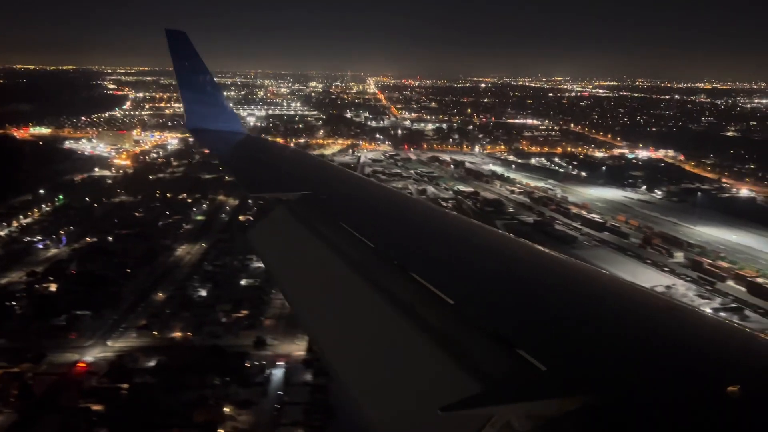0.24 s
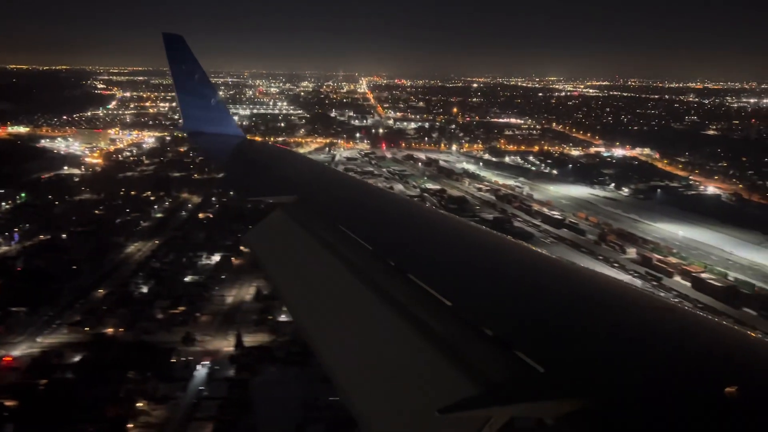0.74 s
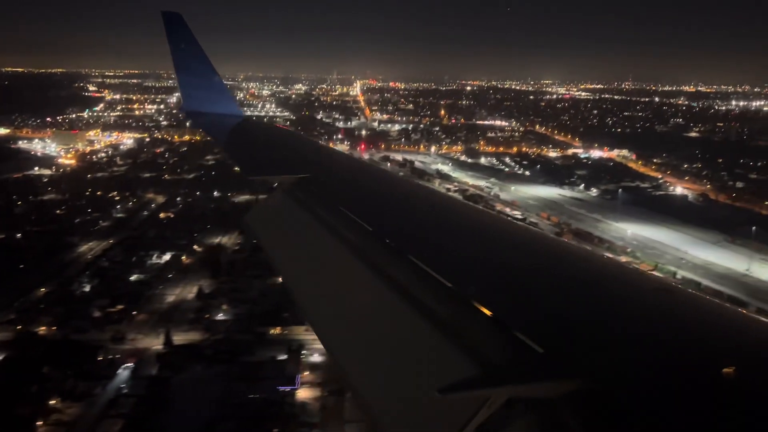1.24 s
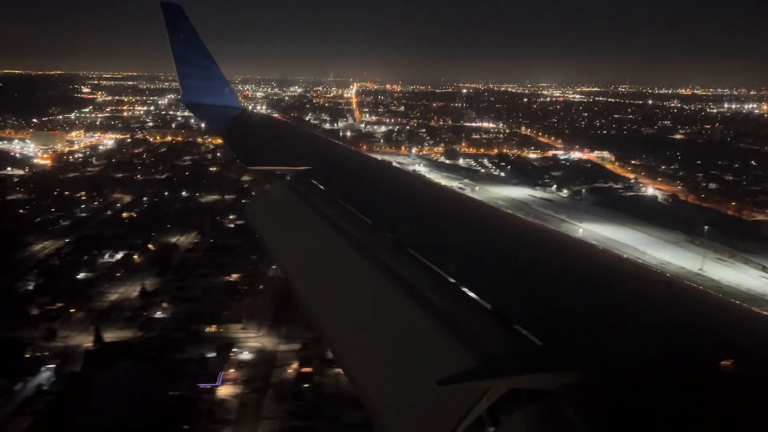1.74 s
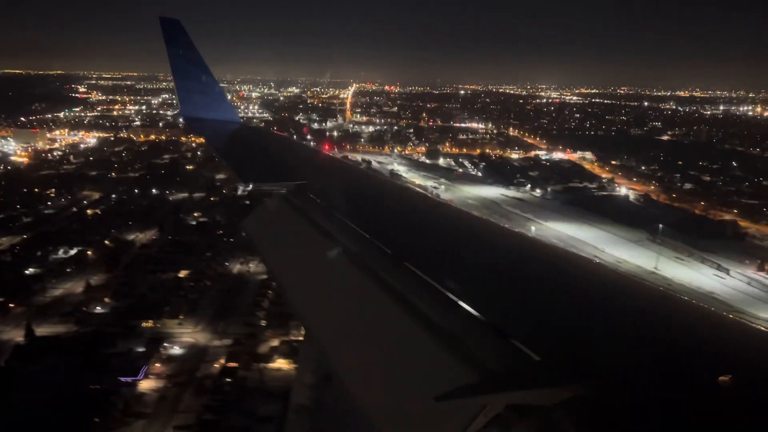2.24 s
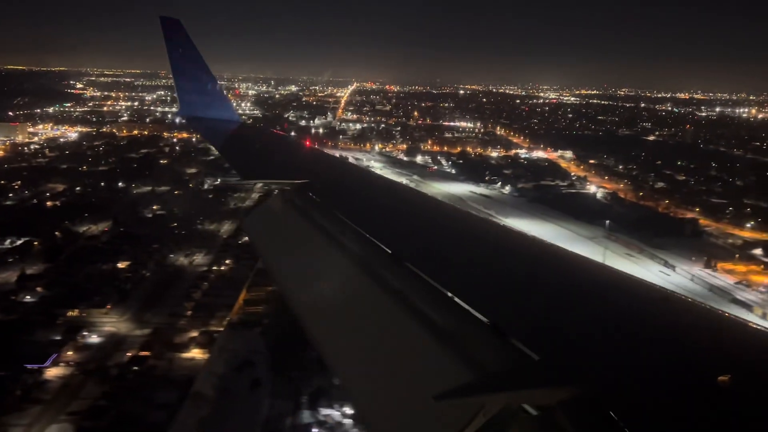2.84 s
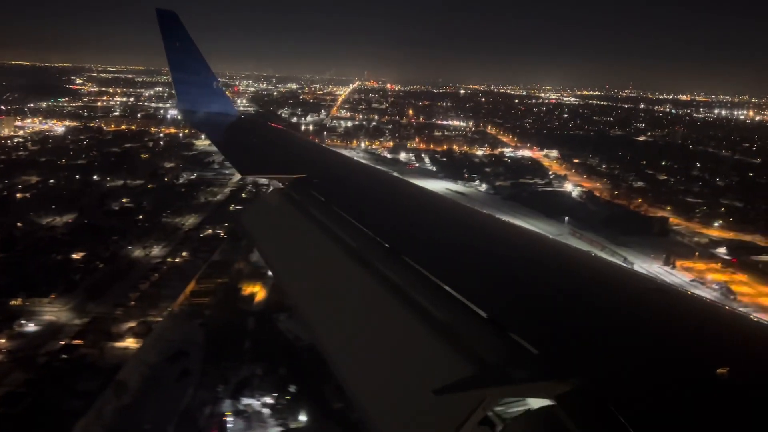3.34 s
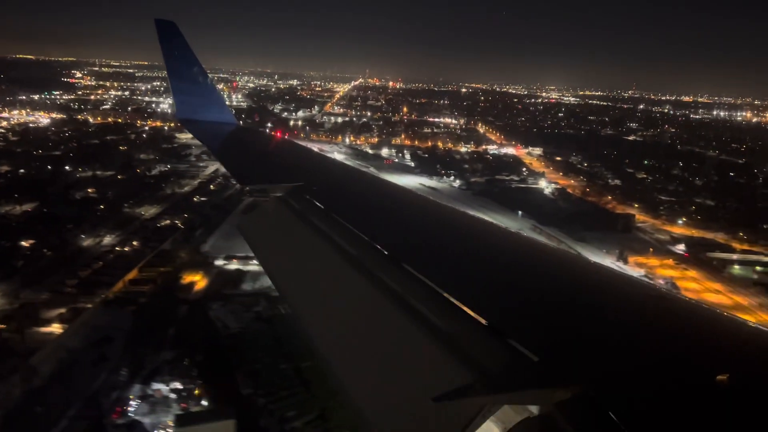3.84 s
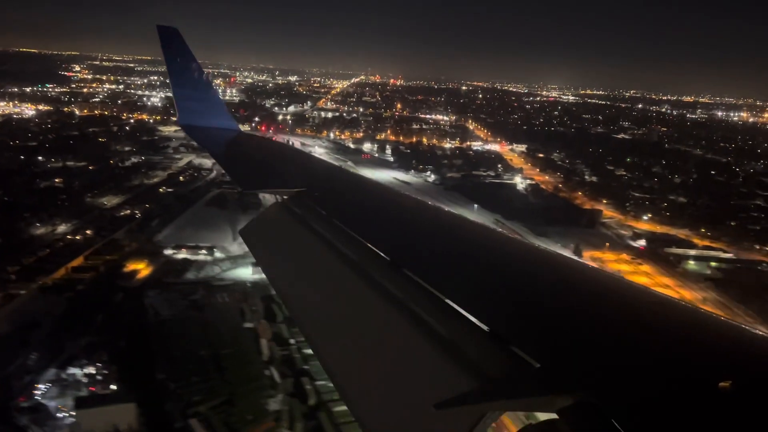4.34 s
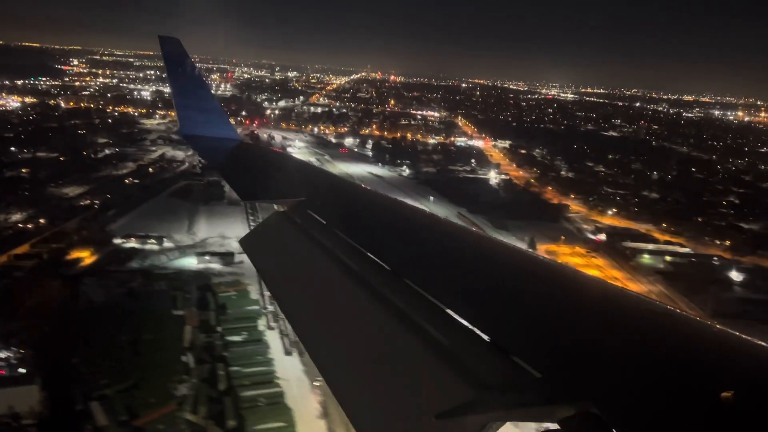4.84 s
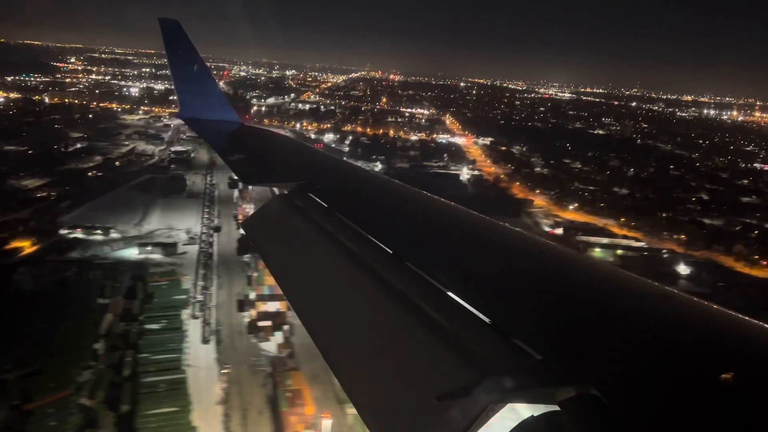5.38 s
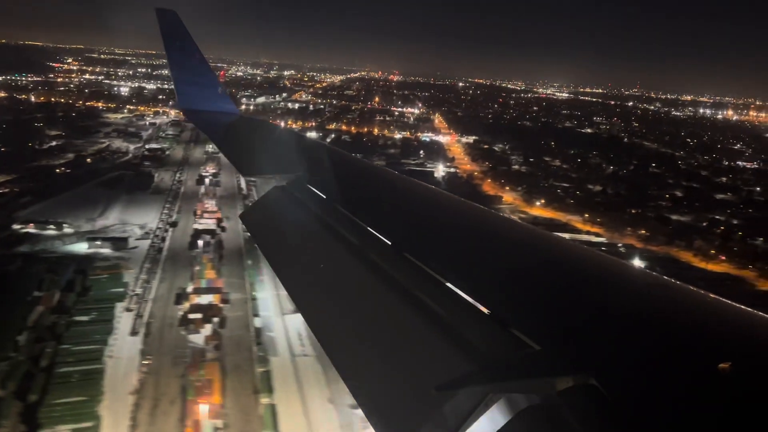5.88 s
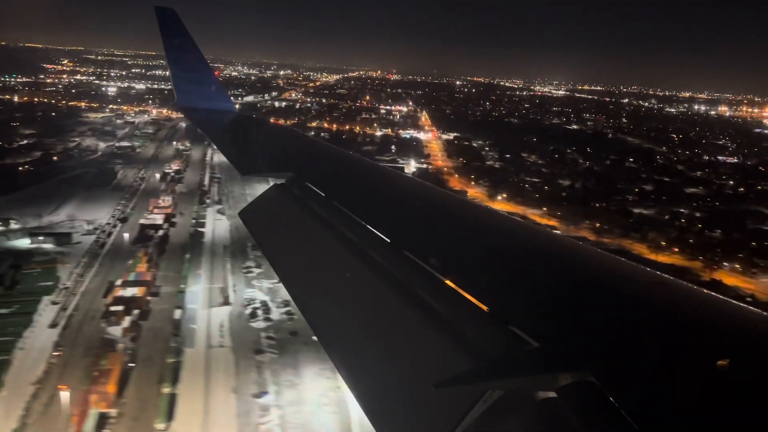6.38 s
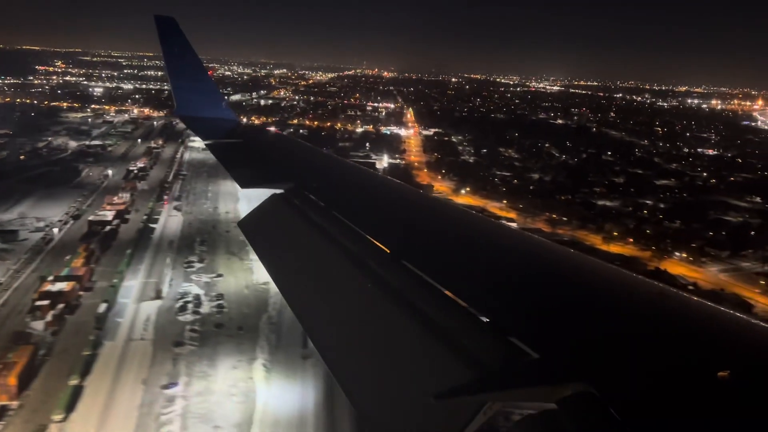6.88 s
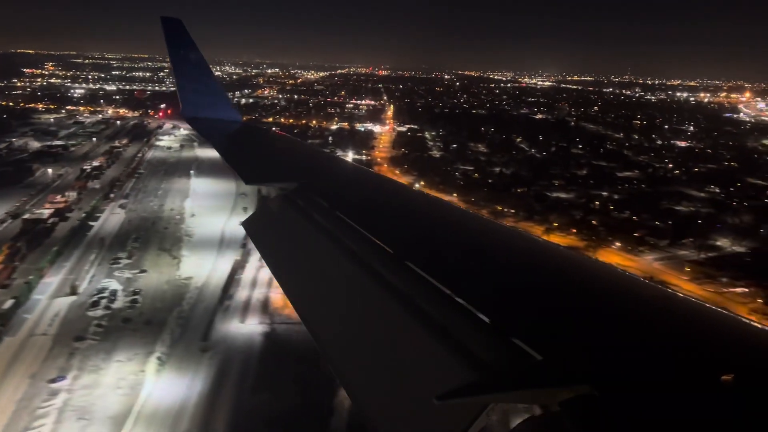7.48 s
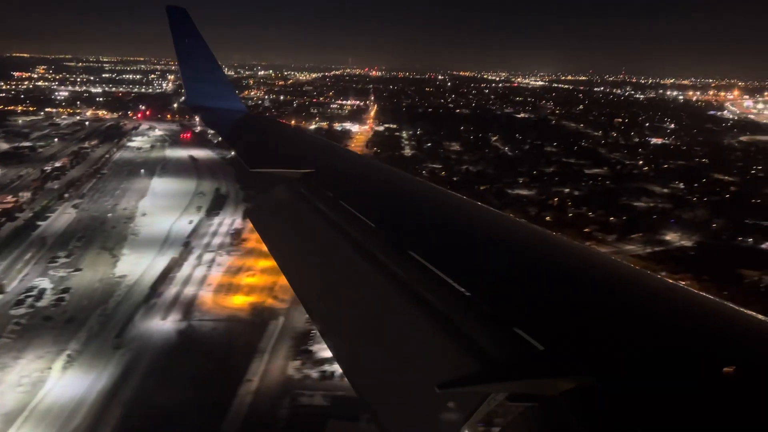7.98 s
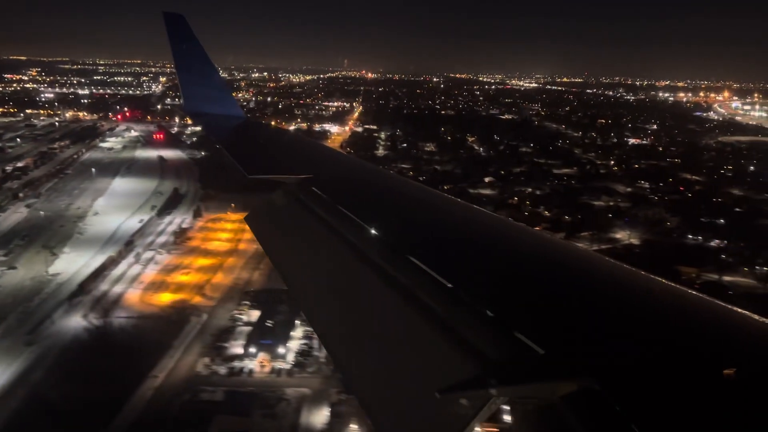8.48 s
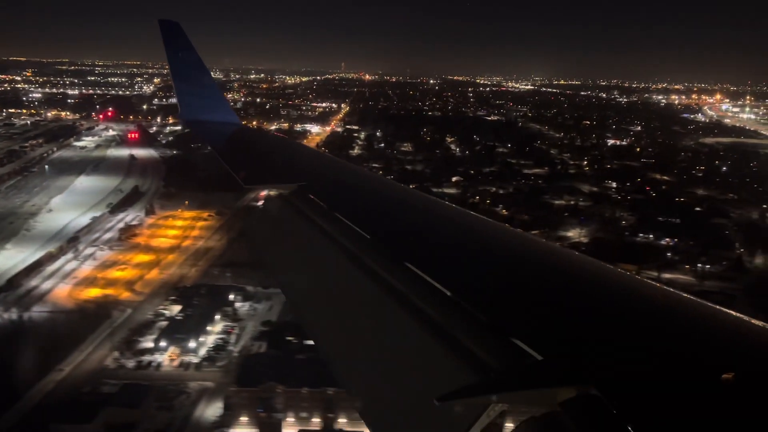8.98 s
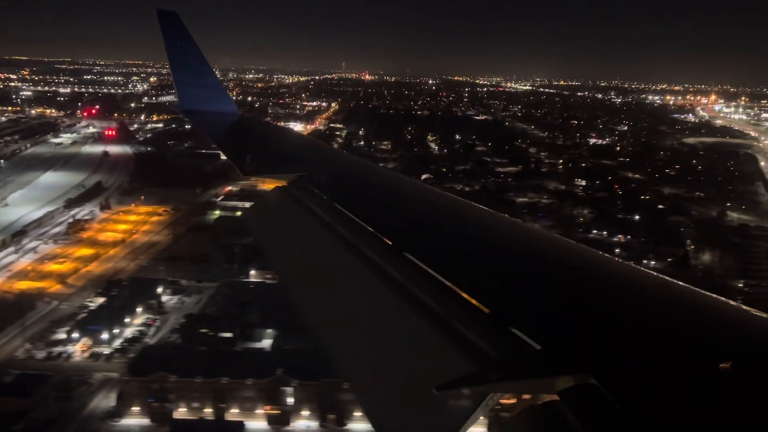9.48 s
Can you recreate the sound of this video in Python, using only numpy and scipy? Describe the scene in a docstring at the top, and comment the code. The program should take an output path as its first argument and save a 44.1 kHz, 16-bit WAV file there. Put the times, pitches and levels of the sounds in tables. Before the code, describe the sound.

Steady airliner cabin roar with a deep jet hum and faint high whines that step slightly upward twice, plus tiny trim squeaks and ticks.

```python
"""Two jet engines whine and beat against each other, spooling up in two small steps, at a window seat
over the wing of an airliner on approach. Rotors are drifting tones tied to the shaft speeds.
Turbulent air, as shaped noise, rumbles, rushes and hisses; short swells of band noise thicken the rumble.
Cabin fans, a pump, a blower and twin motors add tones; the trim squeaks and ticks with short noise bursts."""
import sys
import numpy as np
from scipy import signal
from scipy.fft import rfft, irfft, next_fast_len
from scipy.io import wavfile
from scipy.ndimage import uniform_filter1d

SR = 44100
rng = np.random.default_rng(int(sys.argv[2]) if len(sys.argv) > 2 else 0)


def wav_record(signal):
    """Record a signal, one row per channel, as 16-bit PCM in the file named by sys.argv[1]."""
    frames = np.transpose(np.atleast_2d(signal))
    bounded = np.clip(frames, -1, 1)
    # unit amplitude maps onto the largest positive 16-bit level
    quanta = np.round(bounded * 32767).astype(np.int16)
    wavfile.write(sys.argv[1], SR, quanta)


N = 428640

# core shaft speed, which answers each throttle push sooner than the fan: (time [s], speed [Hz])
CORE_SPEED = [(0, 233), (1.8, 233.15), (2.2, 234.45), (3.5, 234.74), (3.85, 235), (4.25, 237.15),
              (5, 237.37), (5.5, 237.8), (6.2, 238.02), (9.7, 238.13)]


def from_db(db):
    """Decibels to gain."""
    return 10 ** (np.asarray(db) / 20)


def in_time(rows):
    """Each column of a curve table at every sample."""
    time_s, *columns = np.transpose(rows)
    return [np.interp(np.arange(N) / SR, time_s, column) for column in columns]


def at_hz(rows, hz):
    """Each column of a spectrum table, joined on a log-frequency axis."""
    points_hz, *columns = np.transpose(rows)
    return [np.interp(np.log(hz + 1e-9), np.log(points_hz), column) for column in columns]


def bump(x, centre, width):
    """A bell of height 1, `width` wide at half height."""
    return np.exp2(-np.minimum((2 * (x - centre) / width) ** 2, 20))


def drift(rate_hz):
    """Slow noise of spread 1 that changes about `rate_hz` times a second."""
    step = 40  # samples between drawn points
    pole = np.exp(-2 * np.pi * rate_hz * step / SR)
    white = rng.standard_normal(N // step + 2002)
    slow = signal.lfilter([1], [1, -2 * pole, pole * pole], white)[2000:]  # drop the filter's run-in
    return np.interp(np.arange(N) / step, np.arange(len(slow)), slow / slow.std())


def panned(pan_db):
    """Left and right gains of equal total power."""
    gains = from_db([[pan_db / 2], [-pan_db / 2]])
    return gains / np.sqrt(np.mean(gains ** 2))


def tone(hz, level_db, unsteady, flutter_rate, pan_db, lead, ahead=0):
    """A rotor's line, `ahead` [rad] early; moving air scatters a share of it in level and phase."""
    turn = 2 * np.pi * np.cumsum(hz * np.ones(N)) / SR + ahead
    turn = turn + np.array([[lead / 2], [-lead / 2]])  # left leads by `lead` [rad]
    share = np.clip(unsteady, 0, 1)
    in_phase = np.sqrt(2 * (1 - share ** 2)) + share * drift(flutter_rate)
    across = share * drift(flutter_rate)
    return from_db(level_db) * panned(pan_db) * (in_phase * np.cos(turn) + across * np.sin(turn))


def shaft_speed(rows):
    """A speed curve, its corners rounded by the rotor's inertia."""
    inertia_s = .2
    return uniform_filter1d(in_time(rows)[0], int(inertia_s * SR), mode="nearest")


def spool(start_hz, first_hz, second_hz, lag_s):
    """A speed that follows two pushes of the throttle along an S-shaped lag."""
    pushes_s, shape = (1.8, 3.78), 1.3
    t = np.arange(N) / SR
    first, second = (1 - np.exp(-(np.maximum(t - s, 0) / lag_s) ** shape) for s in pushes_s)
    return start_hz + first_hz * first + second_hz * second


def trim_ticks():
    """A panel edge snaps free with a tiny click: decaying noise, high-passed."""
    # dry ticks: (time [s], noise level at onset before the high-pass [dB])
    ticks = [(1.0212, -53), (1.3799, -49), (5.7954, -54)]
    decay_s, low_cut_hz = 0.0012, 7000
    out, t = np.zeros(N), np.arange(SR // 50) / SR
    for s, db in ticks:
        start = int(s * SR)
        out[start:start + len(t)] += from_db(db) * rng.standard_normal(len(t)) * np.exp(-t / decay_s)
    return signal.sosfilt(signal.butter(2, low_cut_hz, "high", fs=SR, output="sos"), out)


def trim_squeaks():
    """Plastic panels slip for a moment and ring in one narrow, high resonance."""
    # squeaks: (time [s], level before the common trim_db [dB], resonance [Hz])
    squeaks = [(1.2344, -52, 7660), (1.5135, -50, 7520), (2.4523, -51, 8390), (2.6983, -49, 8210),
               (3.3577, -44, 8250), (5.5122, -45, 8270), (6.6268, -52, 8400)]
    width_hz, rise_s, trim_db = 300, 0.005, -7
    out, t = np.zeros(N), np.arange(SR // 10) / SR
    envelope = t / rise_s * np.exp(1 - t / rise_s)
    pole = np.exp(-np.pi * width_hz / SR)
    for s, db, hz in squeaks:
        resonance = [1, -2 * pole * np.cos(2 * np.pi * hz / SR), pole * pole]
        ring = signal.lfilter([1], resonance, rng.standard_normal(len(t)))
        start = int(s * SR)
        out[start:start + len(t)] += from_db(db + trim_db) * ring / ring.std() * envelope
    return out * panned(pan_db=-1.0)


def cabin_machines():
    """Electric fans and a blower keep their pitch; one pump speeds up and fades after the second push."""
    # fans and pumps: (pitch [Hz], level [dB], unsteadiness [0-1], left-right [dB], left lead [rad])
    machines = [(416, -46, .5, 2.5, .4), (436, -48, .6, 2.5, .4), (1033, -57, .8, 0, 1),
                (1195, -51, .6, -1, 2.3), (1206, -42, .15, -2.5, 2.1), (1611, -62, .6, -.8, .2),
                (6100, -72, .7, 0, -.4), (6978, -77, .7, 0, 0)]
    # pump: (time [s], pitch [Hz], level [dB])
    pump_curve = [(0, 1104, -46.5), (2.5, 1103, -47), (3.8, 1105, -49), (4.2, 1114, -60), (5.5, 1146, -57)]
    # low blower, swelling near the end: (time [s], level [dB])
    blower_level = [(4.5, -32), (5.6, -37), (7.3, -35), (7.9, -26.5), (8.6, -26), (9.2, -32)]
    blower_hz = 163
    pump_hz, pump_db = in_time(pump_curve)
    blower_db, = in_time(blower_level)
    out = tone(pump_hz, pump_db, unsteady=0.25, flutter_rate=4, pan_db=2.5, lead=-1.2)
    out += tone(blower_hz, blower_db, unsteady=.45, flutter_rate=3, pan_db=.6, lead=.2)
    for hz, db, unsteady, pan_db, lead in machines:
        out += tone(hz, db, unsteady, flutter_rate=2.9, pan_db=pan_db, lead=lead)
    return out


def twin_motors():
    """Two equally loud motors a fraction of a hertz apart swell and cancel in turn."""
    # (mean pitch [Hz], spacing [Hz], time of one cancellation [s])
    motors = (200.2, .575, 1.02)
    hz, apart_hz, cancel_s = motors
    slip = 2 * np.pi * apart_hz * (np.arange(N) / SR - cancel_s)
    return sum(sign * tone(hz, level_db=-34.0, unsteady=0.13, flutter_rate=3.0, pan_db=-0.7, lead=.15,
                           ahead=sign * slip / 2) for sign in (1, -1))


def air_noise(spectrum, low_hz, high_hz):
    """Steep-edged turbulent noise; its left-right likeness varies with frequency."""
    # cabin sound field: (frequency [Hz], likeness [0-1], left lead [rad], left-right [dB])
    field = [(50, 0.997, 0.03, 0.3), (130, 0.986, 0.21, 1.0), (280, 0.937, 0.16, 1.7),
             (440, 0.865, 0.36, 3.2), (530, 0.401, 0.0, 2.7), (700, 0.798, 0.15, 3.3),
             (850, 0.185, -0.21, 0.9), (1000, 0.412, -2.42, -2.2), (1300, 0.464, -2.61, -0.3),
             (1750, .15, -.8, 2), (2220, .75, 0, 3.5), (2380, .25, .3, 3.5), (3250, .68, .85, -.7),
             (3800, .15, 1, 1.5), (4050, .55, -.3, .7), (4400, .15, -.3, .5), (4800, .8, 0, 3),
             (5100, .1, 1, 5.5), (5550, .6, 2.3, 0), (5800, .15, 3, -2), (5950, .45, -1, .5),
             (6900, .68, .1, -.5), (7500, .1, 0, -.5), (8400, .35, -1, -3.5), (9200, .15, -2.6, -3.5),
             (11500, .8, .2, 0)]
    # resonances and hollows of ducts and nozzles: (centre [Hz], width [Hz], gain [dB])
    ducts = [(608, 19, -2), (934, 32, 0), (1860, 70, 1.5), (2230, 60, 6), (2390, 80, 2.5), (2810, 66, 5),
             (3255, 70, 4), (4040, 310, 3.5), (4400, 150, -1.5), (4804, 180, 7), (4900, 70, 4.5),
             (5100, 130, 3.5), (5340, 90, 5), (5460, 70, -3), (5500, 70, 5.5), (5960, 130, 3),
             (6300, 110, 4.5), (8280, 890, 5.5)]
    size = next_fast_len(N)
    hz = np.arange(size // 2 + 1) * SR / size
    alike, lead, pan_db = at_hz(field, hz)
    alike = np.clip(alike, 0, 1)
    mid, side = rfft(rng.standard_normal((2, size)))
    sign = np.array([[1], [-1]])
    pair = np.sqrt((1 + alike) / 2) * mid + sign * np.sqrt((1 - alike) / 2) * side
    pair = pair * np.exp(.5j * sign * lead) * from_db(sign * pan_db / 2)
    colour_db = at_hz(spectrum, hz)[0] + sum(db * bump(hz, centre, width) for centre, width, db in ducts)
    edges = (1 + (low_hz / (hz + 1)) ** 32) * (1 + (hz / high_hz) ** 32)
    return irfft(pair * from_db(colour_db) * np.sqrt(SR / 2 / edges), size)[:, :N]


def air_gain(thrust, level_db, rise_db, slow_db, flicker_db):
    """Gain that rises with thrust, with a slow random drift and a quick random flicker."""
    return from_db(level_db + rise_db * thrust + slow_db * drift(0.39) + flicker_db * drift(13.6))


def waver_bands(x, patchy_db, size=512):
    """Random slow gains make each narrow band of the hiss waver on its own."""
    cells = signal.stft(x, nperseg=size)[2]
    chance = uniform_filter1d(rng.standard_normal(cells.shape[1:]), size=9, axis=1)
    gain = from_db(patchy_db * chance / chance.std())
    return signal.istft(cells * gain / np.sqrt(np.mean(gain ** 2)), nperseg=size)[1][:, :N]


def airflow(thrust):
    """The fuselage rumbles, the boundary layer rushes on the skin, the vents hiss."""
    # spectra before duct colour and gains: (frequency [Hz], density [dB per Hz])
    rumble_spectrum = [(20, -78), (28, -63), (35, -49.5), (48, -44.5), (60, -37.5), (72, -41.5),
                       (90, -43.5), (128, -41), (185, -43.5), (270, -48.5), (345, -53.5), (400, -51),
                       (460, -56.5), (520, -64)]
    rush_spectrum = [(580, -64), (680, -58), (750, -61.5), (810, -68), (950, -66), (1250, -70),
                     (1420, -77.5), (1600, -73.5), (1780, -81), (2000, -78.5), (2300, -80.5), (2600, -84.5),
                     (3100, -87.5), (3700, -88)]
    hiss_spectrum = [(3800, -87), (4450, -90), (5300, -86), (6200, -86), (6700, -89.5), (7400, -91.5),
                     (8500, -92.5), (9450, -92.5), (10300, -110), (11500, -96.5), (12300, -94.5),
                     (13100, -97), (13900, -106), (15200, -110)]
    # gains: (at low thrust [dB], rise to high thrust [dB], slow drift [dB], quick flicker [dB])
    rumble_level = (-0.88, 1, 0.21, 0.44)
    rush_level = (-0.6, 1.36, 0.24, 0.7)
    hiss_level = (-1.35, 2, .25, .25)
    sizzle_level = (-5, 1.3, .3, .4)
    # rumble, easing between the two pushes: (time [s], gain [dB])
    rumble_swell = [(0, -0.5), (2.2, .2), (3, -1), (3.9, 0.1), (4.6, 0), (5.5, -1), (7.2, -1.1), (8.6, -.1),
                    (9.7, 0.1)]
    swell_db, = in_time(rumble_swell)
    rumble = air_noise(rumble_spectrum, 25, 600) * air_gain(thrust, *rumble_level) * from_db(swell_db)
    rush = air_noise(rush_spectrum, 515, 3730) * air_gain(thrust, *rush_level)
    hiss = air_noise(hiss_spectrum, 3830, 7230) * air_gain(thrust, *hiss_level)
    sizzle = air_noise(hiss_spectrum, 7000, 16000) * air_gain(thrust, *sizzle_level)
    return rumble + rush + waver_bands(hiss + sizzle, patchy_db=2.5)


def band_swell(s, length_s, level_db, hz):
    """A band of noise that swells and dies away, `length_s` long at half height."""
    width = .3  # bandwidth as a share of the pitch
    out, start, count = np.zeros(N + SR), int(s * SR) - SR // 2, SR
    band_hz = [hz * (1 - width / 2), hz * (1 + width / 2)]
    band = signal.butter(2, band_hz, "band", fs=SR, output="sos")
    shape = bump(np.arange(count) / SR, 0.485, length_s)  # centred 15 ms before s
    burst = signal.sosfilt(band, rng.standard_normal(count)) * shape
    out[start:start + count] = from_db(level_db) * burst * np.sqrt(np.sum(shape ** 2) / np.sum(burst ** 2))
    return out[:N]


def noise_swells():
    """Short swells of low and middle noise, most near 70 Hz, thicken the rumble; a brief rustle joins."""
    # swells: (time [s], level [dB], centre [Hz])
    swells = [(4.25, -35, 690), (4.35, -36, 690), (5.4, -19, 135), (6.1, -19.5, 72), (6.98, -20, 70),
              (7.3, -19.5, 70), (7.64, -20, 72), (8.35, -25, 45), (9.0, -18.5, 62), (9.38, -20, 58),
              (9.43, -20, 145)]
    # rustle: (time [s], length [s], level [dB], centre [Hz])
    rustle = (2.68, .25, -56, 4900)
    lumps = sum(band_swell(s, .1, db, hz) for s, db, hz in swells)
    return (lumps + band_swell(*rustle)) * panned(pan_db=0.3)


def engine_whistles():
    """The compressor blades whistle on the core shaft; the turbine's higher whistle comes and goes."""
    # whistle levels: (time [s], level [dB])
    compressor_level = [(0, -72), (.7, -62), (1.1, -69), (1.9, -67), (2.4, -58.5), (2.9, -57), (3.9, -65),
                        (5, -64), (5.55, -56), (6, -68), (7.2, -70), (8.1, -58.5)]
    turbine_level = [(0, -66), (1.8, -66), (3.1, -63), (4.4, -70), (5.6, -63.5), (7.3, -63.5), (7.6, -73)]
    # turbine pitch: (start [Hz], first rise [Hz], second rise [Hz], lag [s])
    turbine_spool = (8002, 85, 203, .8)
    compressor_blades = 26
    compressor_db, = in_time(compressor_level)
    turbine_db, = in_time(turbine_level)
    compressor_hz = compressor_blades * shaft_speed(CORE_SPEED)
    compressor = tone(compressor_hz, compressor_db, unsteady=0.28, flutter_rate=6, pan_db=-1.0, lead=-1.4)
    turbine = tone(spool(*turbine_spool), turbine_db, unsteady=0.63, flutter_rate=12, pan_db=-14, lead=-1)
    return compressor + turbine


def engine_cores(thrust):
    """Each core hums and drives a geared accessory; the engines beat as they slip past each other."""
    # far core minus near core: (start [Hz], first change [Hz], second change [Hz], lag [s])
    far_core_gap = (1.196, -1.196, -1.035, .7)
    # near hum, sinking between the two pushes: (time [s], level [dB])
    hum_level = [(0, -21.8), (1.2, -19.8), (2, -21.5), (2.75, -19.8), (3.05, -31), (3.7, -31), (4.1, -18.7),
                 (4.9, -22.4), (5.3, -24), (5.9, -20.8), (6.8, -21.7), (7.2, -24.5), (7.7, -21.8),
                 (9.3, -23.3), (9.7, -21.5)]
    gear_ratio, in_step_s = 2.302, 3.4  # the two hums oppose each other at in_step_s
    shaft_hz = shaft_speed(CORE_SPEED)
    slip = 2 * np.pi * np.cumsum(spool(*far_core_gap)) / SR
    slip -= slip[int(in_step_s * SR)]
    hum_db, = in_time(hum_level)
    hum = tone(shaft_hz, hum_db, unsteady=0.04, flutter_rate=2.6, pan_db=0.9, lead=0.21)
    hum -= tone(shaft_hz, hum_db - 13.5, unsteady=0.04, flutter_rate=2.3, pan_db=0.5, lead=.2, ahead=slip)
    hum += tone(2 * shaft_hz, -56 + 10.5 * thrust, unsteady=0.7, flutter_rate=2.4, pan_db=5.0, lead=.3)
    gear_hz, gear_db = gear_ratio * shaft_hz, -41 + 4.3 * thrust
    gear = tone(gear_hz, gear_db, unsteady=0.19, flutter_rate=2.7, pan_db=-1.0, lead=-1.7)
    gear += tone(gear_hz, gear_db - 7.0, unsteady=0.17, flutter_rate=3.7, pan_db=4.0, lead=-2.54,
                 ahead=gear_ratio * slip)
    gear += tone(2 * gear_hz, -48.5 + 3.5 * thrust, unsteady=0.37, flutter_rate=1.7, pan_db=1.5, lead=2.4)
    return hum + gear


def engine_fan(blade_hz, thrust):
    """Four blade harmonics flare and dip across cabin resonances; the shaft drones at 1 and 6 per turn."""
    # blade harmonics: (level at low thrust [dB], rise to high thrust [dB], share of the swell,
    # unsteadiness [0-1], flutter [per s], left-right [dB], left lead [rad])
    fan_harmonics = [(-61.3, 5.3, .7, .12, 7, 2.5, .89), (-70.5, 7.7, 1, .25, 7, 6, -.93),
                     (-65.5, 4, 0, .3, 8, -2, -.62), (-78, 15.5, .25, .3, 7, -9, -1.4)]
    # cabin resonances and nulls: (centre [Hz], width [Hz], gain [dB])
    whine_peaks = [(1971, 30, 6), (2055, 34, -5), (3930, 26, 6), (3955, 24, -6), (3994, 26, 11),
                   (4032, 14, -7), (4064, 34, 7), (4102, 18, 5), (4133, 20, -14), (4163, 15, 6.5),
                   (5930, 40, -5), (5962, 26, 12), (6048, 30, -10), (6150, 130, 3.5), (6255, 22, -10),
                   (6298, 44, 8), (8335, 60, -7)]
    # whine swell: (time [s], gain [dB])
    fan_swell = [(1.8, 3), (5.4, 4), (5.7, 3), (6, 7.5), (6.5, 7), (6.8, 8.3), (7.1, 8.3), (7.35, -.5),
                 (8.0, -0.5), (8.5, 3)]
    # shaft drone: (time [s], level [dB])
    drone_level = [(0, -26), (2.3, -27), (5.2, -27), (5.8, -29), (6.5, -27), (7.1, -23), (7.8, -24.5),
                   (8.3, -38), (9.1, -30), (9.6, -34)]
    fan_blades = 28
    swell_db, = in_time(fan_swell)
    drone_db, = in_time(drone_level)
    shaft_hz = blade_hz / fan_blades
    sixth_db = -37.5 - 20 * thrust  # fades as thrust rises
    out = tone(shaft_hz, drone_db, unsteady=0.18, flutter_rate=2.7, pan_db=-0.5, lead=.1)
    out += tone(6 * shaft_hz, sixth_db, unsteady=0.35, flutter_rate=3, pan_db=3.5, lead=0.29)
    for k, (db, rise_db, share, unsteady, flutter_rate, pan_db, lead) in enumerate(fan_harmonics, 1):
        hz = k * blade_hz
        flare_db = sum(peak_db * bump(hz, centre, width) for centre, width, peak_db in whine_peaks)
        level_db = db + rise_db * thrust + flare_db + swell_db * share
        out += tone(hz, level_db, unsteady, flutter_rate, pan_db, lead)
    return out


def scene():
    """Everything heard at the seat; thrust runs from 0 to 1 with the speed of the fan."""
    # fan speed, nudged up twice: (time [s], blade passing [Hz])
    fan_speed = [(0, 1940.7), (1.1, 1938), (1.8, 1940.3), (2.2, 1953.5), (2.7, 1966.6), (3.4, 1980),
                 (3.85, 1986), (4.4, 2032), (4.8, 2057.6), (5.2, 2076.3), (6.05, 2096.2), (6.7, 2100.9),
                 (8.6, 2102), (9.7, 2100)]
    blade_hz = shaft_speed(fan_speed)
    thrust = (blade_hz - blade_hz.min()) / np.ptp(blade_hz)
    cabin = trim_ticks() + trim_squeaks() + cabin_machines() + twin_motors()
    air = airflow(thrust) + noise_swells()
    engines = engine_whistles() + engine_cores(thrust) + engine_fan(blade_hz, thrust)
    return cabin + air + engines


def record(dry):
    """The ends are eased over 10 ms and the top is cut steeply."""
    cutoff_hz = 15300
    eased = dry * signal.windows.tukey(N, .02 * SR / N)
    return signal.sosfilt(signal.ellip(10, .1, 80, cutoff_hz, fs=SR, output="sos"), eased)


dry = scene()
out = record(dry)
wav_record(out)
```